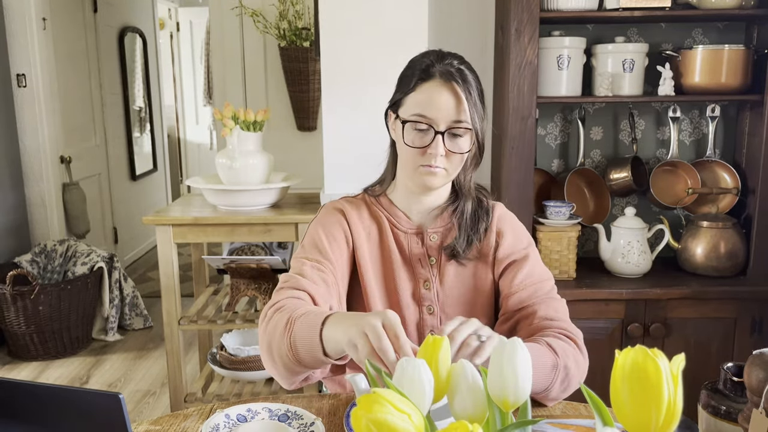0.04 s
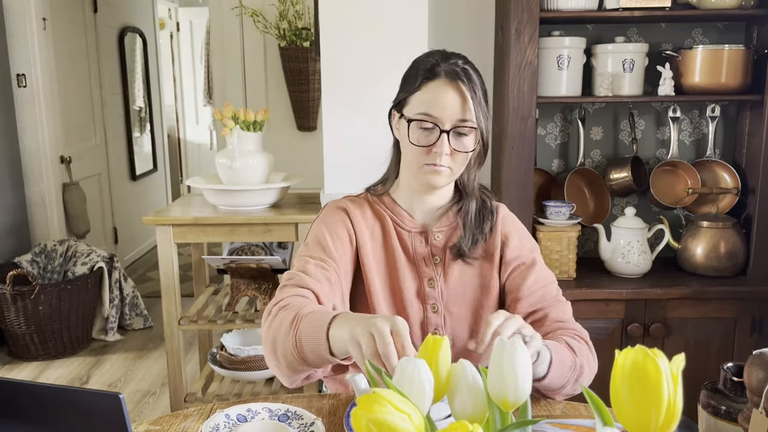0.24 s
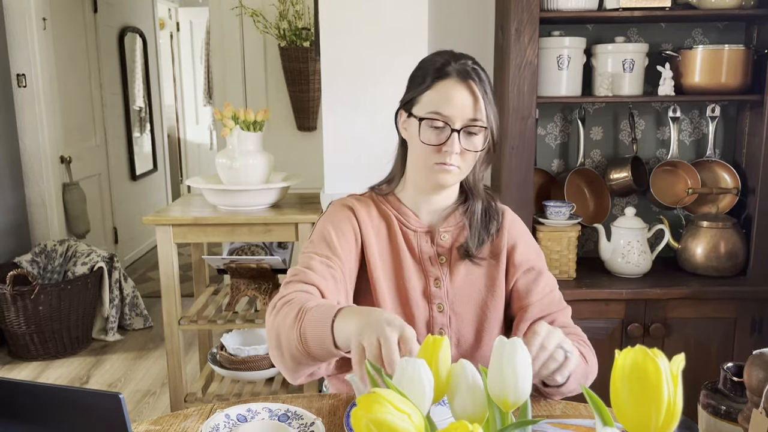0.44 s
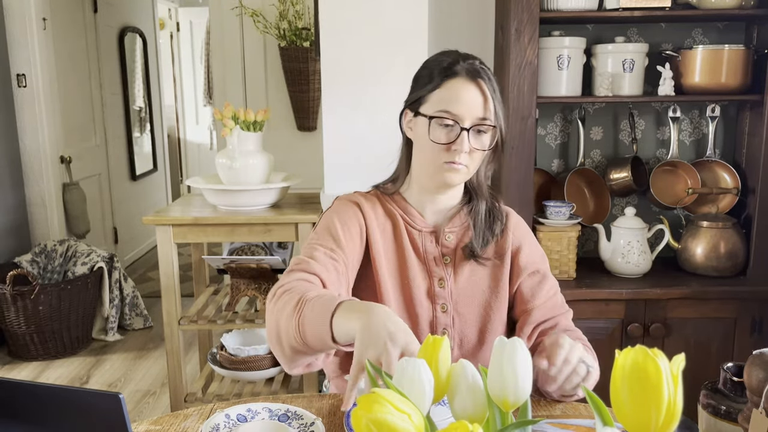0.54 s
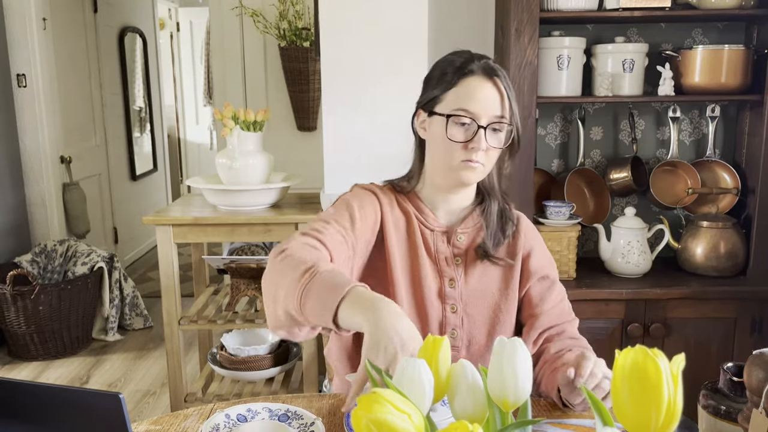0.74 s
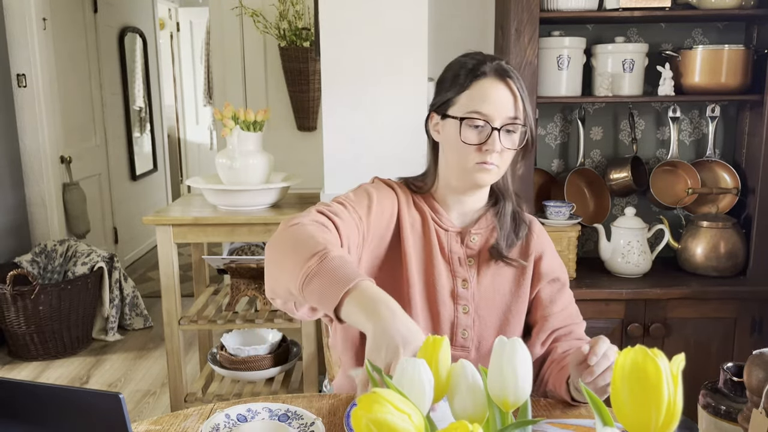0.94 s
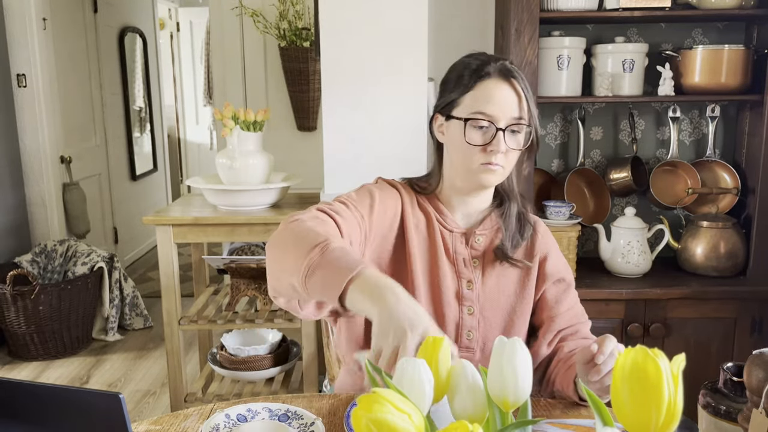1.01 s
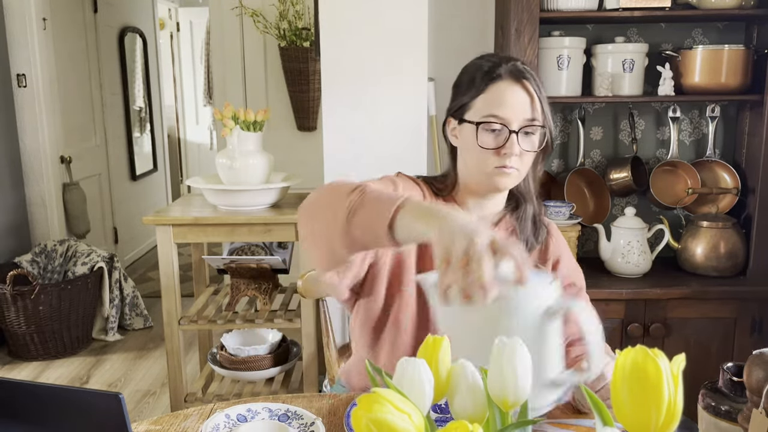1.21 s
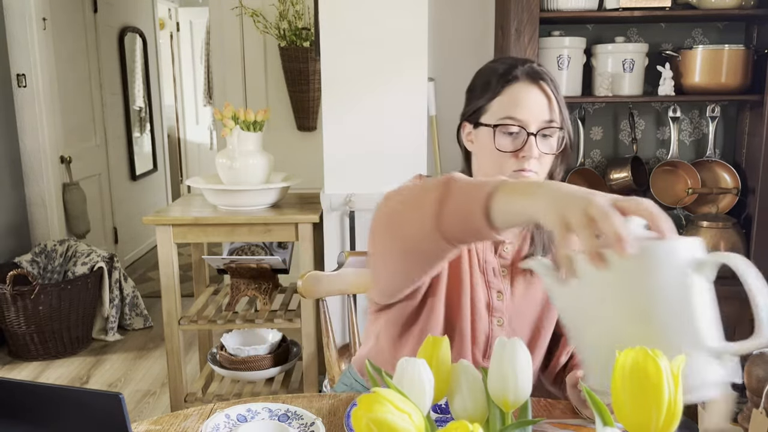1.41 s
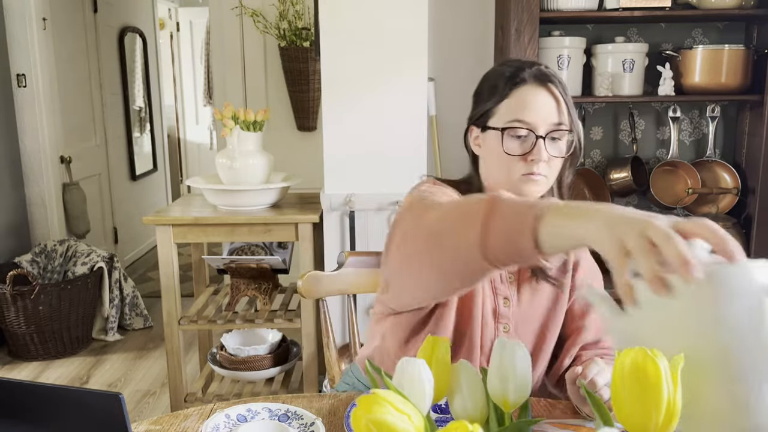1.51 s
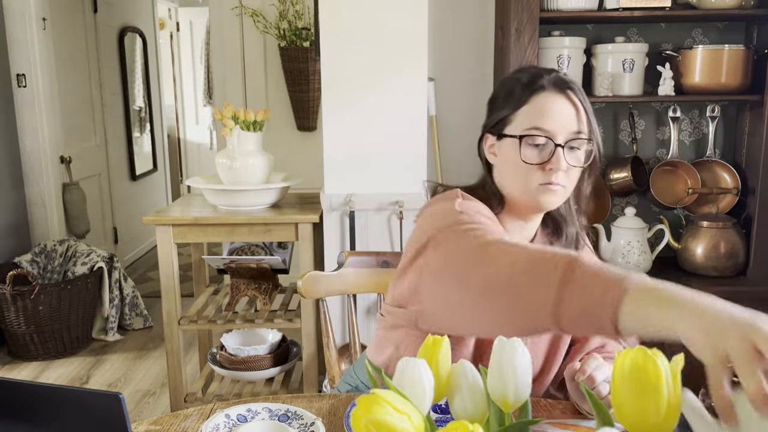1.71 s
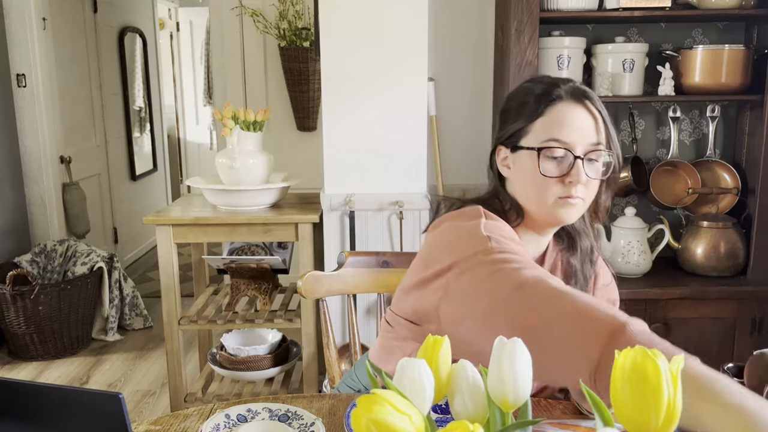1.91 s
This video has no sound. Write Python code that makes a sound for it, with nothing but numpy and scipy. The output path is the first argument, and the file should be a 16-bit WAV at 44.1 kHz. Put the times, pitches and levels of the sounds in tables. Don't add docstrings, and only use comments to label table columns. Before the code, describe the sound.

A ceramic lid is seated on a china teapot: four quick clusters of clinks from 0.18 to 0.42 seconds, bright, gritty and briefly ringing, with hollow low thumps beneath. Near quiet follows. Faint muffled knocks come at 0.73 to 1.04 as the pot is lifted, then tiny bumps and soft sleeve rustle from about 1.25, strongest near 1.75. Close microphone, small quiet kitchen, short echo, low rumble and faint hum.

```python
import sys
import numpy as np
from scipy import signal
from scipy.fft import rfft, irfft
from scipy.io import wavfile
from scipy.ndimage import uniform_filter1d

SR = 44100
rng = np.random.default_rng(int(sys.argv[2]) if len(sys.argv) > 2 else 0)


def persist_wave(psi):
    counts = np.round(np.clip(psi, -1, 1) * 32767).astype(np.int16)
    wavfile.write(sys.argv[1], SR, np.atleast_2d(counts).T)


def voltage_ratio(level):
    return 10 ** (np.asarray(level, float) / 20)


N = 85995

# t/s, pot level/dB, lid level/dB, rim level/dB
BOUNCES = [(0.1788, -30, -49.5, -68), (0.1825, -29, -48, -70.5), (0.2217, -21, -40, -56),
           (0.226, -23.5, -41.5, -56), (.2337, -25, -28.5, -42.5), (.2390, -23.5, -32.5, -46.5),
           (0.312, -21, -20.5, -36), (0.3177, -22.5, -19, -44), (0.325, -23.5, -24.5, -39.5),
           (.3320, -23.5, -21.5, -37.5), (0.34, -33.5, -32.5, -57), (0.3583, -37.5, -22.5, -47.5),
           (0.3651, -29, -15.5, -27.5), (0.37, -30.5, -19.5, -33), (0.376, -36, -27.5, -35),
           (0.39, -28, -28, -36), (.382, -38, -30.5, -45), (.400, -28.5, -24.5, -43),
           (0.413, -34.5, -35, -51)]
POT_HZ = [982, 1095, 1216, 1388, 1705, 2163, 2600, 2879, 2957, 3097, 3339, 4353, 4647, 4722]
LID_HZ = [1207, 2585, 2838, 2864, 2980, 3134, 3174, 3216, 3289, 3800, 4040, 4358, 4525, 4736]
RIM_HZ = [6411, 7422, 7480, 7650, 7715, 7850]
# level/dB, time to fall 60 dB/s, left over right/dB, left lead/rad
POT_MODES = [(-7, 0.33, -2.5, -1.5), (-11, .2, 6, 0.052), (1, 0.17, -3.5, -1.7), (-7.5, .13, 1, -1.1),
             (-14.5, 0.2, 1.5, -.3), (-10, 0.094, 5.5, -.2), (-4, .18, 5, 1.4), (-4.5, 0.22, -2.5, 0.17),
             (-12.5, .22, 9, 1.5), (-5, .15, 1, .7), (-10.5, 0.15, 4, 1.2), (-12, 0.27, 8, 0.56),
             (-11.5, .2, 10.5, -0.24), (-18.5, 0.39, 14.5, 1)]
LID_MODES = [(-12.5, 0.19, 5.5, 0.53), (-7, .26, 4, -0.61), (-10, 0.17, 0, .5), (-4.5, 0.2, -0.5, .4),
             (-12, .26, 9.5, 1.1), (1.5, 0.15, 3, .9), (-4, 0.082, -2, 2.8), (-6.5, 0.14, 7.5, 1.1),
             (-13.5, .2, 0, 1.6), (-8, 0.33, 8, -2.4), (-13.5, 0.34, 9, 0.4), (-15, .26, 2, -0.99),
             (-16, 0.2, 7, 1.6), (-7, 0.51, 9.5, 2.6)]
RIM_MODES = [(-12.5, 0.1478, 0, -1), (-7, 0.1, -1, -3.5), (-4.5, 0.11, -1.006, -1.5),
             (6.5, 0.21, 1.2, -2.5), (-1, 0.11, 2, -2), (-8, 0.11, 2.8, 13.5)]
# f/Hz, level per Hz/dB
CRACK_COLOUR = [(250, -49), (600, -13), (1200, -4), (3100, -11), (5300, -22.5), (6000, -18.5),
                (8700, -11.5), (11500, -32)]
# t/s, level/dB, f/Hz
THUMPS = [(.180, -25.5, 502), (0.179, -25, 340), (.223, -27, 499), (0.229, -17.5, 335), (0.245, -35, 335),
          (0.317, -17.5, 501), (0.32, -17, 210), (0.36, -19.5, 335), (0.367, -24.5, 160),
          (0.369, -23.5, 223), (0.386, -27, 505), (.392, -24.5, 163.4), (.398, -26.5, 324.4),
          (0.181, -43, 170), (.225, -38, 130), (0.234, -39.5, 215), (.366, -30.5, 610), (.40, -28.5, 590),
          (.425, -36.5, 225)]
# t/s, ring level/dB, thud level/dB, ring f/Hz, thud f/Hz
KNOCKS = [(0.734, -61, -54, 1086, 522.6), (0.746, -65.5, -49, 587, 302), (.779, -70.5, -55, 409, 126.9),
          (0.877, -59.5, -50, 1045, 488), (.882, -47.5, -44.5, 1044, 164.5),
          (0.902, -55.5, -47, 1043, 120.2), (0.915, -51, -49, 1717, 260), (.935, -60, -49.5, 574, 208),
          (.981, -70, -45.5, 330, 225.3), (0.989, -70, -47.5, 592, 95.3), (1.006, -43, -58, 1328, 388),
          (1.0079, -43, -53, 1784, 232), (1.009, -57.5, -42.5, 2860, 602), (1.019, -75, -49, 1860, 85.4),
          (1.0076, -64, -72, 3660, 774), (1.035, -59.5, -52.5, 1250, 216), (0.895, -60, -49, 1454, 513),
          (.922, -67, -62, 1950, 340), (1.012, -64, -72, 3875, 900), (1.024, -61, -64, 1517, 292),
          (1.277, -65, -81, 5800, 250), (1.361, -69, -53.5, 1285, 342), (1.37, -60.5, -61.5, 858, 128.4),
          (1.393, -84, -63.5, 902, 110), (1.53, -73, -52, 526, 357), (1.537, -67.5, -50, 733, 129),
          (1.555, -72.5, -55.5, 893, 234), (1.579, -66, -68, 378, 109), (1.615, -64, -59, 450, 428.5),
          (1.632, -62.5, -56.5, 550, 200), (1.65, -65, -60, 862, 119), (1.695, -64.5, -52.5, 655, 110.7),
          (1.735, -72, -53.5, 800, 93), (1.762, -85, -60.5, 702, 89.4)]
# t/s, level/dB
SLEEVE_LEVEL = [(0, -92.5), (.9, -90.5), (0.999, -72.5), (1.199, -91), (1.265, -76), (1.28, -72),
                (1.329, -73.5), (1.37, -68), (1.44, -80), (1.58, -76), (1.651, -67), (1.74, -64.5),
                (1.862, -68), (1.95, -68.5)]
# f/Hz, level per Hz/dB
CLOTH_COLOUR = [(200, -17), (700, -8.5), (1300, -7.5), (4300, -5), (5800, -11), (8300, -24.5),
                (12500, -15.5), (15500, -31)]
# f/Hz, level per Hz/dB
AIR_COLOUR = [(8.8, -35), (15, -2), (70, -1.5), (567, -24.5), (715, -30), (1610, -32.5), (12300, -44),
              (15600, -50.5)]
# f/Hz, level/dB
HUM = [(62, -67.5), (120, -68.5)]
# f/Hz, likeness (1 = equal)
LIKENESS = [(60, .96), (380, .7), (2000, .3), (15000, .4)]
# f/Hz, left lead/rad
LEFT_LEAD = [(100, 0), (5500, .3), (7400, -2.1), (9100, -3.6), (10600, -6.2), (13400, -6.9), (15200, -10)]
# f/Hz, time to fall 60 dB/s
ECHO_T60 = [(100, 0.38), (1000, 0.33), (5000, .28), (14000, 0.19)]
# f/Hz, level/dB
MIC_COLOUR = [(0, -12), (45, 0.5), (7800, -3.5), (8150, -8.5), (9500, -5), (9900, -3), (14300, -4.5),
              (15200, -5)]

SIDES = np.array([[.5], [-.5]])
TILT_DB = [[.6], [-.6]]


def evened(x):
    return x / np.sqrt(np.mean(x ** 2) + 1e-20)


def read(points, hz):
    f, value = np.transpose(points)
    return np.interp(np.log(hz + 1), np.log(f + 1), value)


def add(mix, s, sound):
    part = mix[..., round(s * SR):][..., :sound.shape[-1]]
    part += sound[..., :part.shape[-1]]


def clinks():
    out, grit, t = np.zeros((2, N)), np.zeros(N), np.arange(2000) / SR
    glaze = crowd(9800, 14600, db=-12, t60=0.09, count=30)
    rim = np.vstack([np.column_stack([RIM_HZ, RIM_MODES]), glaze])
    pot_wall = crowd(400, 5700, db=-23, t60=0.19, count=36)
    pot = np.vstack([np.column_stack([POT_HZ, POT_MODES]), pot_wall])
    lid_wall = crowd(400, 5700, db=-23, t60=0.19, count=36)
    lid = np.vstack([np.column_stack([LID_HZ, LID_MODES]), lid_wall])
    crack_s = 0.014
    for s, pot_db, lid_db, rim_db in BOUNCES:
        add(out, s, ring(pot, pot_db))
        add(out, s, ring(lid, lid_db))
        add(out, s, ring(rim, rim_db))
        strength = np.hypot(voltage_ratio(pot_db), voltage_ratio(lid_db))
        add(grit, s, strength * np.exp(-t / crack_s) * rng.standard_normal(len(t)))
    return out + crack(grit)


def ring(modes, db):
    detune, spot_db, longest_t60_s, rise_s = .001, 3, .28, 0.00049
    quick_share, quick_factor, chatter = .5, 4, .4
    t, side = np.arange(SR // 4) / SR, SIDES[:, None]
    hz, mode_db, t60, pan_db, lead = np.transpose(modes)[:, :, None]
    spot, sign, drift = rng.standard_normal((len(hz), 3, 1)).transpose(1, 0, 2)
    free = voltage_ratio(-60 * t / np.clip(t60, .01, longest_t60_s))
    fade = quick_share * free ** quick_factor + (1 - quick_share) * free
    steps = np.repeat(rng.standard_normal((len(hz), 50)), 256, axis=1)[:, :len(t)]
    fade = fade * uniform_filter1d(1 + chatter * steps, size=300, axis=1)
    level = np.sign(sign) * voltage_ratio(db + mode_db + spot_db * spot + side * pan_db) * fade
    tones = np.sin(2 * np.pi * hz * (1 + detune * drift) * t + side * lead)
    return (level * tones).sum(1) * np.minimum(t / rise_s, 1)


def crowd(lo_hz, hi_hz, db, t60, count):
    hz, draw = np.sort(rng.uniform(lo_hz, hi_hz, count)), rng.standard_normal((count, 4))
    level_db, fall_s = db + 3.2 * draw[:, 0], t60 * np.exp(0.22 * draw[:, 1])
    pan_db, lead = 0.5 + 5.8 * draw[:, 2], read(LEFT_LEAD, hz) + 0.69 * draw[:, 3]
    return np.column_stack([hz, level_db, fall_s, pan_db, lead])


def crack(grit):
    hz = np.fft.rfftfreq(2048, 1 / SR)
    log_gain = np.log(voltage_ratio(np.maximum(read(CRACK_COLOUR, hz), -100)))
    circle = np.concatenate([log_gain, log_gain[-2:0:-1]])
    colour = np.fft.ifft(np.exp(signal.hilbert(circle).conj())).real[:1024]
    left = signal.oaconvolve(grit, voltage_ratio(-7) * colour / np.linalg.norm(colour))[:N]
    lag = np.exp(-1j * read(LEFT_LEAD, np.fft.rfftfreq(N, 1 / SR)))
    return np.array([left, 0.648 * irfft(rfft(left) * lag, N)])


def thumps():
    t60_s, rise_s = .075, .003
    out, t = np.zeros((2, N)), np.arange(SR // 4) / SR
    for s, db, hz in THUMPS:
        lead = SIDES * (hz / 700) ** 2 * rng.standard_normal()
        swell = voltage_ratio(db - 60 * t / t60_s) * (1 - np.exp(-t / rise_s))
        add(out, s, swell * np.sin(2 * np.pi * hz * t + lead))
    return out


def knocks():
    ring_t60_s, thud_cycles, thud_spread = 0.033, 12.8, 0.32
    tick_db, rough, side_rings = -20, 0.416, 0.21
    out, t = np.zeros((2, N)), np.arange(SR // 5) / SR
    for s, ring_db, thud_db, hz, thud_hz in KNOCKS:
        spread, grit = rng.standard_normal((6, 1)), rng.standard_normal((2, len(t)))
        lead = SIDES * rng.standard_normal()
        neighbours = np.sin(2 * np.pi * hz * np.exp(0.09 * spread) * t).sum(0)
        tap = np.sin(2 * np.pi * hz * t + lead) + side_rings * neighbours
        tap = tap * (1 + rough * evened(uniform_filter1d(grit[0], size=120)))
        low_hz = thud_hz * np.exp(thud_spread * spread)
        thud = np.sin(2 * np.pi * thud_hz * t + .4 * lead)
        thud = thud + .3 * np.sin(2 * np.pi * (low_hz * t + rng.random((6, 1)))).sum(0)
        dull = signal.butter(4, min(2 * hz, 6000), fs=SR)
        tick = evened(signal.lfilter(*dull, grit[1])) * np.exp(-t / .012)
        tap_and_tick = tap * voltage_ratio(-60 * t / ring_t60_s) + voltage_ratio(tick_db) * tick
        add(out, s, np.minimum(t / .002, 1) * voltage_ratio(ring_db) * tap_and_tick)
        thud_fade = voltage_ratio(thud_db - 60 * t * thud_hz / thud_cycles)
        add(out, s, np.minimum(t / 0.0025, 1) * thud * thud_fade)
    return out * voltage_ratio(TILT_DB)


def sleeve():
    s, db = np.transpose(SLEEVE_LEVEL)
    movement = voltage_ratio(np.interp(np.arange(N) / SR, s, db))
    return movement * hiss(CLOTH_COLOUR, patchy_db=2.5, swell_db=1.)


def hiss(colour, patchy_db, swell_db):
    frames, hz = N // 256 + 5, np.fft.rfftfreq(1024, 1 / SR)
    a, b, c, d, patches = rng.standard_normal((frames, 513, 5)).T
    patches = evened(uniform_filter1d(uniform_filter1d(patches, size=10, axis=0), size=8, axis=1))
    swell = evened(uniform_filter1d(rng.standard_normal(frames), size=12))
    same = np.clip(read(LIKENESS, hz), -1, 1)[:, None]
    left, other = a + 1j * b, c + 1j * d
    right = same * left + np.sqrt(1 - same ** 2) * other
    right = right * np.exp(-1j * read(LEFT_LEAD, hz))[:, None]
    level = voltage_ratio(read(colour, hz)[:, None] + patchy_db * patches + swell_db * swell)
    noise = signal.istft(np.array([left, right]) * level, nperseg=1024, noverlap=768)[1]
    return evened(noise[:, :N])


def air():
    t, hum = np.arange(N) / SR, np.zeros(N)
    for hz, db in HUM:
        waver = evened(uniform_filter1d(rng.standard_normal(N), size=3000))
        hum += voltage_ratio(db + 2.8 * waver) * np.sin(2 * np.pi * hz * t)
    return voltage_ratio(-63.5) * hiss(AIR_COLOUR, patchy_db=1.3, swell_db=1.0) + hum * voltage_ratio(TILT_DB)


def kitchen(x):
    echoes = np.zeros((2, SR // 2))
    at = np.arange(200, SR // 2 - 20, 20)
    at = at + rng.integers(0, 20, (2, len(at)))
    np.put_along_axis(echoes, at, rng.choice([-1., 1.], at.shape), 1)
    echoes = np.array([echoes[0], 0.79 * echoes[0] + .45 * echoes[1]])
    hz, t, bands = signal.stft(echoes, SR, nperseg=256)
    fade = voltage_ratio(-60 * t / read(ECHO_T60, hz)[:, None])
    tail = signal.istft(bands * fade, SR, nperseg=256)[1]
    return signal.fftconvolve(x, tail / np.linalg.norm(tail[0]), axes=1)[:, :N]


def scene():
    near = voltage_ratio(-1.5) * (clinks() + thumps()) + knocks()
    return near + voltage_ratio(-2.5) * kitchen(near) + sleeve() + air()


def top_cut(x):
    return signal.sosfilt(signal.butter(12, 15710, fs=SR, output="sos"), x)


def record(dry):
    hz, db = np.transpose(MIC_COLOUR)
    gain = voltage_ratio(np.interp(np.fft.rfftfreq(N, 1 / SR), hz, db))
    heard = irfft(rfft(dry) * gain, N)
    lowpass = signal.firwin(401, 15680, window=("kaiser", 8), fs=SR)
    mix = signal.oaconvolve(heard, lowpass[None], "same")
    return top_cut(mix)


dry = scene()
out = record(dry)
persist_wave(out)
```